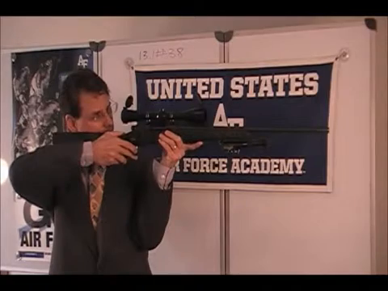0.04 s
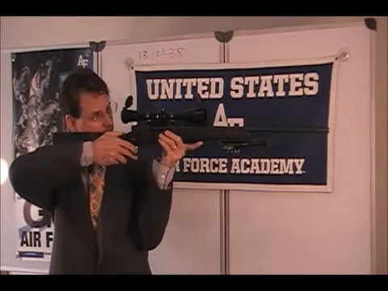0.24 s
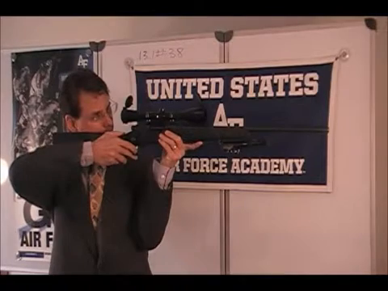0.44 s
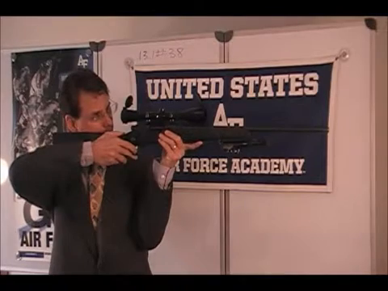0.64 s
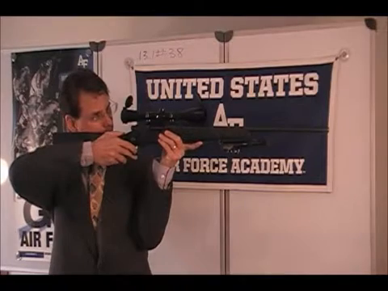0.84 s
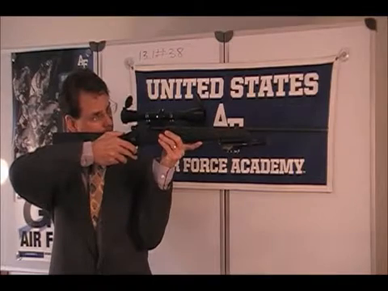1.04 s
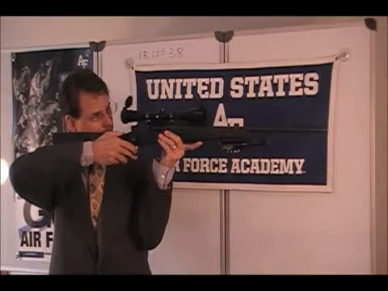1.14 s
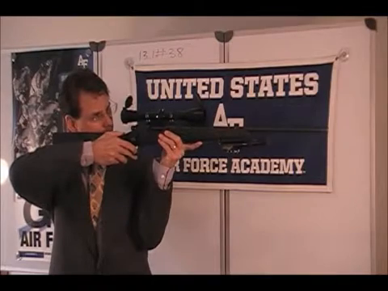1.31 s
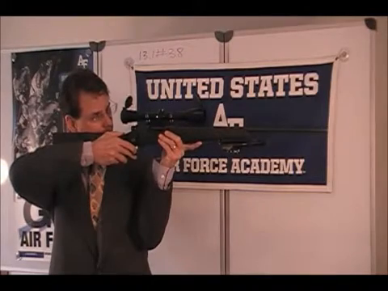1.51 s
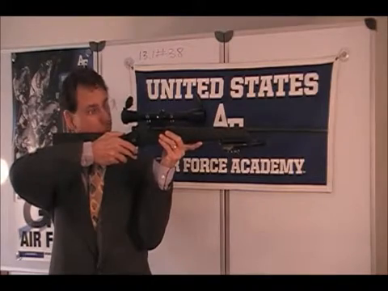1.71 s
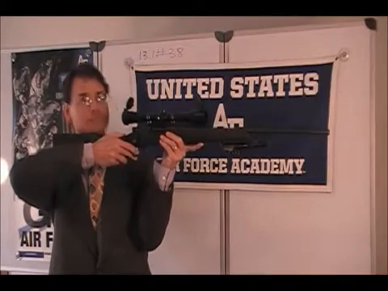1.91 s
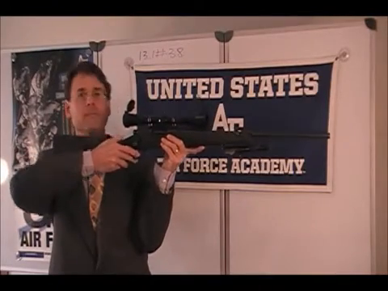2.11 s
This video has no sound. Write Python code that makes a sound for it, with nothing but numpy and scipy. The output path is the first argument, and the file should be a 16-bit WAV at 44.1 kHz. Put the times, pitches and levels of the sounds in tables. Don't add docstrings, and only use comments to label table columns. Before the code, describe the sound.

Single hard dry-fire click of a bolt-action rifle, with short bright echo over faint ventilation hum

```python
import sys
import numpy as np
from scipy import signal
from scipy.fft import rfft, irfft
from scipy.io import wavfile

SR = 44100
rng = np.random.default_rng(int(sys.argv[2]) if len(sys.argv) > 2 else 0)


def volts_from_decibels(level):
    exponent = np.asarray(level, float) / 20
    return 10 ** exponent


def digitize_waveform(pressure):
    field = np.atleast_2d(pressure).T
    bounded = np.clip(field, -1, 1)
    quanta = np.round(bounded * 32767).astype(np.int16)
    wavfile.write(sys.argv[1], SR, quanta)


N = 94947
T = np.arange(N) / SR
SEAR_S, SLIDE_S, BLOW_S = 1.2812, 1.284, 1.2887
LEFT_RIGHT = np.array([[1], [-1]])

# pitch_hz, density_db
AIR_CENTRE = [(35, -4), (90, -2), (140, -1), (300, -6), (1000, -10.5), (3000, -16), (8000, -26),
              (15000, -34)]
# pitch_hz, density_db
AIR_DIFFERENCE = [(18, -48), (30, -11.5), (187, 0), (410, -2), (467, -2.5), (728, -4), (2070, -13),
                  (2240, -14), (15500, -38.5)]
# pitch_hz, level_db, waver_db, left_lead_rad
HUM_AND_MOTOR = [(29.5, -65.5, 1.2, .15), (120, -64.5, 2.5, .1), (662, -79, 1.5, 3.1),
                 (721, -78, 1.5, -2.9), (1023, -76, 1.2, -1.5), (1084, -76, 1.2, -1.5),
                 (1144, -75.5, 1.2, -1.5), (2167, -71, .9, -.5), (4274, -88, .6, .1)]
# pitch_hz, level_db, t60_s
SEAR_MODES = [(2700, 0, .2), (8500, -8, .2)]
# pitch_hz, level_db, t60_s
SLIDE_MODES = [(2700, 0, .012), (8800, -2, .008), (13000, -8, .004)]
# pitch_hz, level_db, t60_s
BLOW_MODES = [(140, -38, 0.012), (220, -43, .025), (450, -39.5, 0.041), (720, -31, .02), (1160, -28, 0.028),
              (1796, -22.5, 0.045), (2500, -22, .02), (3140, -24.5, .02), (4000, -22, 0.016),
              (7900, -23.5, .008)]
# pitch_hz, level_db, t60_s
ACTION_MODES = [(1170, -16, .012), (1870, -12, .012), (2500, -12, .01), (3140, -12, .01), (3950, -9, .01),
                (5700, -18, .006), (7500, -11, .006), (8600, -6, .008), (10750, 1, .009), (12570, -1, .01),
                (14600, -14, .006)]
# delay_s, level_db, left_right_db
WALL_ECHOES = [(.008, -11, 1.5), (.0107, -15, -2), (.0205, -15, 2), (.027, -17, -1.5)]
# pitch_hz, level_db, t60_s, left_right_db
BARREL_MODES = [(1396, -47, 1.5, 1.5), (1458, -50, 1.2, -1.5), (3542, -60, 2.2, 1.5), (4856, -69, 2.0, .1),
                (1700, -36, .4, 1.5), (1905, -34, .3, .1), (2038, -38, .4, -1.5), (3025, -38, .4, .1),
                (4027, -35, .35, -3), (4120, -32, .4, 3), (4215, -32, .45, -3), (8400, -35, .4, 4),
                (8580, -33, .45, -4), (8690, -31, .5, 4)]
# pitch_hz, width_hz, level_over_crack_db
BODY_RESONANCES = [(1150, 200, 1.5), (1880, 220, 7), (2990, 180, 4), (7400, 400, .1), (4170, 190, 12),
                   (8650, 230, 12), (10700, 450, 5), (12560, 220, 7)]
# pitch_hz, t60_s
ROOM_DECAY = [(200, 0.62), (700, 0.43), (2000, 0.42), (5000, 0.43), (9000, 0.32), (14000, 0.23)]
# pitch_hz, level_db
ROOM_TONE = [(150, -21.5), (400, -9), (900, -4), (2500, -0.5), (5500, -0.5), (8000, 4.5), (11000, -2),
             (14000, -21.5)]
# pitch_hz, correlation (no unit)
ROOM_LIKENESS = [(200, 0.14), (600, .75), (1500, 1), (3500, 0.47), (6500, 0.84), (9000, 0.189),
                 (14000, 0.19)]
# start_s, level_db, pitch_hz
CREAK_TICKS = [(2.0048, -59, 1050), (2.0072, -62, 2250), (2.035, -71, 1200), (2.058, -73, 2200),
               (2.076, -76, 4800), (2.088, -72, 3700), (2.089, -69, 2200), (2.099, -77, 3800),
               (2.106, -70, 1300), (2.111, -73, 2200)]


def at_hz(points, hz):
    table = np.array(points)
    return np.interp(np.log(hz), np.log(table[:, 0]), table[:, 1])


def rms_one(x):
    return x / np.sqrt(np.mean(x ** 2) + 1e-20)


def drift(rate_hz):
    r = np.exp(-2 * np.pi * rate_hz * 40 / SR)
    slow = signal.lfilter([1], [1, -2 * r, r * r], rng.standard_normal(N // 40 + 2002))
    slow = slow[2000:]
    return np.interp(np.arange(N) / 40, np.arange(len(slow)), rms_one(slow - slow.mean()))


def coloured(spectrum):
    hz = np.maximum(np.fft.rfftfreq(N, 1 / SR), 1)
    white = rfft(rng.standard_normal(N))
    return rms_one(irfft(white * volts_from_decibels(at_hz(spectrum, hz)) * (hz > 25), N))


def band_noise(noise, band_hz):
    return signal.sosfilt(signal.butter(2, band_hz, "band", fs=SR, output="sos"), noise)


def clicks_at(s, gains):
    out = np.zeros(N)
    np.add.at(out, (np.asarray(s) * SR).astype(int), gains)
    return out


def ring(drive, hz, t60):
    r, w = volts_from_decibels(-60 / (t60 * SR)), 2 * np.pi * hz / SR
    return signal.lfilter([0, np.sin(w)], [1, -2 * r * np.cos(w), r * r], drive + 1e-18)


def soft_ring(drive, hz, t60):
    return ring(ring(drive, hz, t60), hz, t60)


def modes(drive, table):
    out = 0
    for k, (hz, db, t60) in enumerate(table):
        out = out + (-1) ** k * volts_from_decibels(db) * ring(drive, hz, t60)
    return out


def background():
    out = volts_from_decibels(-63.5) * coloured(AIR_CENTRE) + volts_from_decibels(-57) * coloured(AIR_DIFFERENCE) * LEFT_RIGHT
    for hz, db, waver_db, lead in HUM_AND_MOTOR:
        phase = 2 * np.pi * hz * T + rng.uniform(0, 2 * np.pi) + lead * LEFT_RIGHT / 2
        level = np.sqrt(2) * volts_from_decibels(db + waver_db * drift(9))
        out = out + level * np.sin(phase)
    return out


def sleeve():
    start_s, rise_s, level_db = 1.23, 0.4, -73.5
    cloth = rms_one(band_noise(rng.standard_normal(N), (248, 4900)))
    return volts_from_decibels(level_db + 2 * drift(16)) * cloth * np.clip((T - start_s) / rise_s, 0, 1)


def sear():
    swell_s = 0.0015
    tick = modes(clicks_at([SEAR_S], volts_from_decibels(-30)), SEAR_MODES)
    return tick * np.clip((T - SEAR_S) / swell_s, 0, 1) * (T < BLOW_S)


def slide():
    final_db, rise_db_per_s = -14, 5500
    level = volts_from_decibels(final_db + rise_db_per_s * np.minimum(T - BLOW_S, 0))
    scrape = rng.standard_normal(N) * level * (T > SLIDE_S) * (T < BLOW_S)
    return modes(scrape, SLIDE_MODES)


def blow():
    ping = soft_ring(clicks_at([BLOW_S], volts_from_decibels(6)), 9000, 0.0017)
    return modes(clicks_at([BLOW_S], volts_from_decibels(12)), BLOW_MODES) + ping


def rattle():
    lag_s, hold_s, t60_s, level_db, side_db = 0.0006, 0.0028, 0.004, -15, -8
    since = T - BLOW_S - lag_s
    chatter = volts_from_decibels(level_db - 60 * np.maximum(since - hold_s, 0) / t60_s) * (since > 0)
    mid = modes(chatter * rng.standard_normal(N), ACTION_MODES)
    side = volts_from_decibels(side_db) * modes(chatter * rng.standard_normal(N), ACTION_MODES)
    return mid, side


def near_walls(mid):
    dull = signal.sosfilt(signal.butter(1, 6000, fs=SR, output="sos"), mid)
    out = 0
    for delay, db, pan_db in WALL_ECHOES:
        out = out + np.roll(dull, int(delay * SR)) * volts_from_decibels(db + pan_db / 2 * LEFT_RIGHT)
    return out


def action():
    strike = sear() + slide() + blow()
    rattle_mid, rattle_side = rattle()
    mid = strike + rattle_mid
    return mid + rattle_side * LEFT_RIGHT + near_walls(mid)


def barrel():
    out = 0
    for hz, db, t60, pan_db in BARREL_MODES:
        tone = ring(clicks_at([BLOW_S], volts_from_decibels(4 + db)), hz, t60) * volts_from_decibels(1.5 * drift(12))
        out = out + tone * volts_from_decibels(pan_db / 2 * LEFT_RIGHT)
    return out


def crack():
    click = clicks_at([BLOW_S], 0.85)
    out = click
    for hz, width_hz, db in BODY_RESONANCES:
        r = np.exp(-np.pi * width_hz / SR)
        feedback = [1, -2 * r * np.cos(2 * np.pi * hz / SR), r * r]
        peak = signal.lfilter([(1 - r * r) / 2, 0, (r * r - 1) / 2], feedback, click + 1e-18)
        out = out + volts_from_decibels(db) * peak
    return volts_from_decibels(-10) * out


def room(x):
    delay_s, build_s, top_hz = 0.002, 0.0044, 15000
    t, tail = T[:SR], 0
    edges = 90 * 2 ** np.arange(0, 7.6, .5)
    white = rng.standard_normal((2, 2, SR))
    for k, (low, high) in enumerate(zip(edges, edges[1:])):
        mid, side = band_noise(white[k % 2], [low, high])
        hz = np.sqrt(low * high)
        alike = np.clip(at_hz(ROOM_LIKENESS, hz), -.98, .98)
        fade = volts_from_decibels(at_hz(ROOM_TONE, hz) - 60 * t / at_hz(ROOM_DECAY, hz))
        tail = tail + fade * (np.sqrt(1 + alike) * mid + np.sqrt(1 - alike) * side * LEFT_RIGHT)
    tail = tail * np.clip((t - delay_s) / build_s, 0, 1)
    tail = signal.sosfilt(signal.cheby2(10, 50, top_hz, fs=SR, output="sos"), tail)
    return signal.fftconvolve(x[None], tail, axes=1)[:, :N]


def creaks():
    return sum(soft_ring(clicks_at([s], volts_from_decibels(db)), hz, 0.006) for s, db, hz in CREAK_TICKS)


def scene():
    handling = sleeve() + creaks()
    rifle = action() + barrel()
    reflections = room(crack() + volts_from_decibels(-40.5) * handling)
    return rifle + handling + reflections + background()


def roll_off(x):
    return signal.sosfilt(signal.butter(12, 15970, fs=SR, output="sos"), x)


def record(dry):
    duck_s, duck_db, attack_s, hold_s, recover_s = 1.279, -12, 0.0014, 0.04, 0.14
    down = np.clip((T - duck_s) / attack_s, 0, 1)
    back = np.clip((T - duck_s - hold_s) / recover_s, 0, 1)
    ducked = np.clip(dry * volts_from_decibels(duck_db * down * (1 - back)), -1, 1)
    top_cut = signal.cheby2(8, 40, 16200, fs=SR, output="sos")
    mix = np.clip(signal.sosfilt(top_cut, ducked), -1, 1)
    return roll_off(mix)


dry = scene()
out = record(dry)
digitize_waveform(out)
```